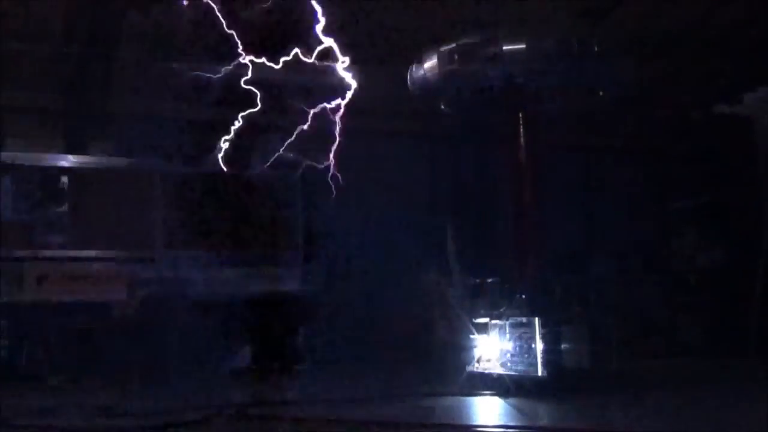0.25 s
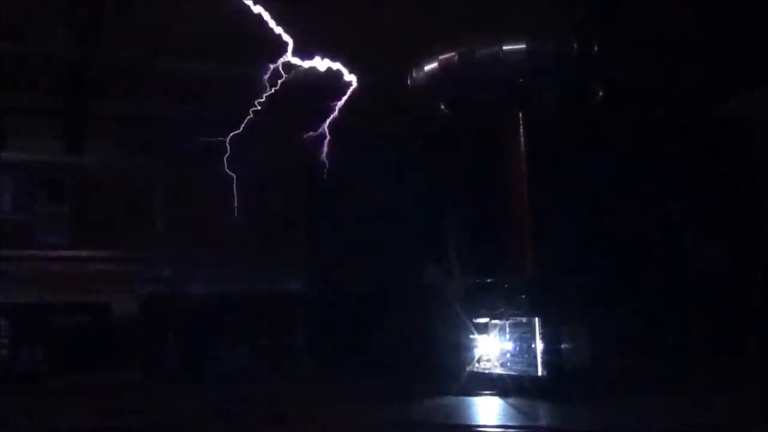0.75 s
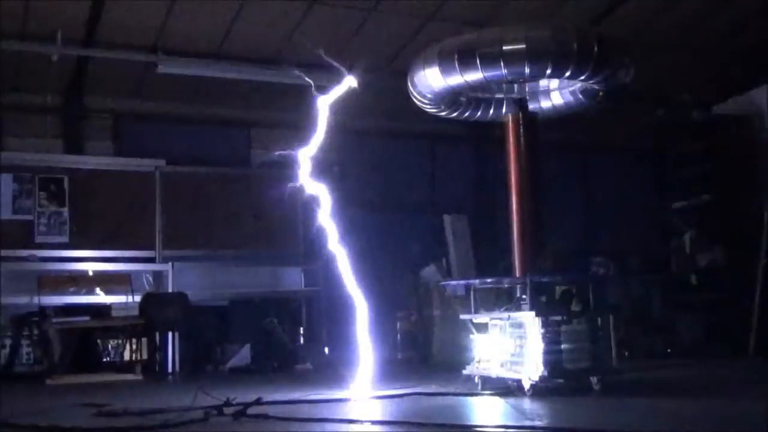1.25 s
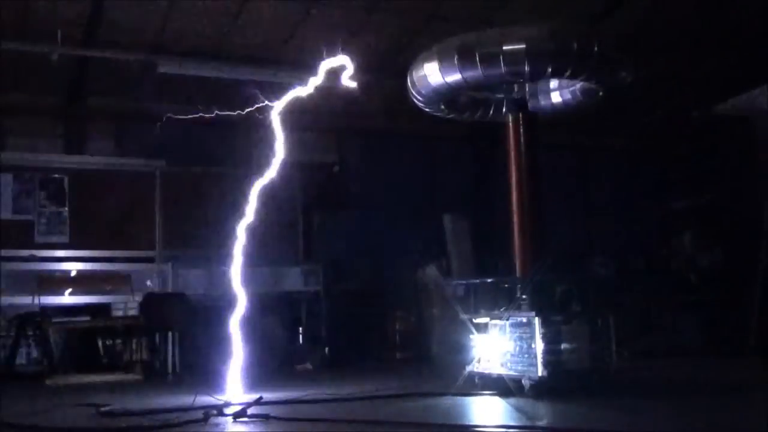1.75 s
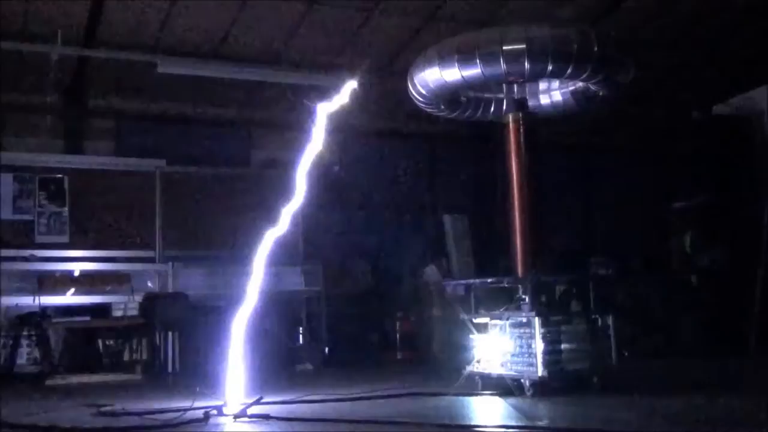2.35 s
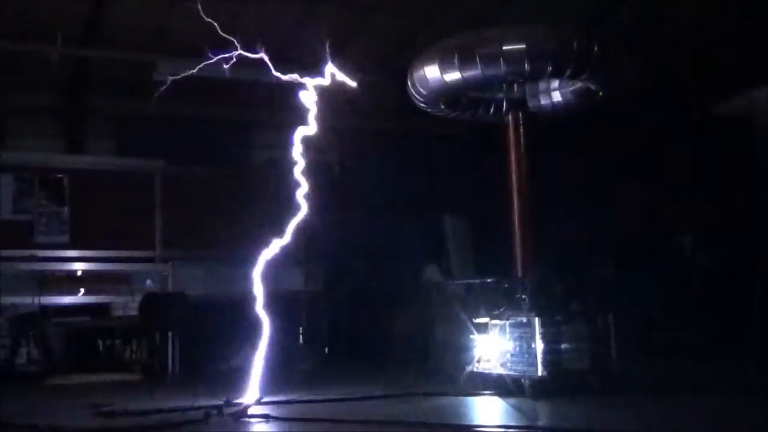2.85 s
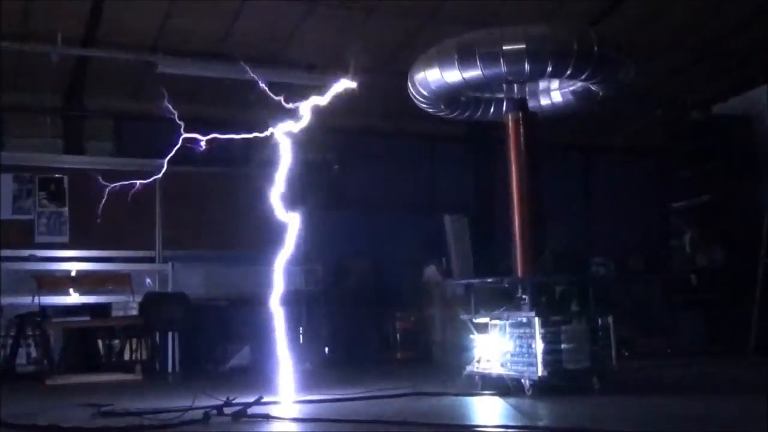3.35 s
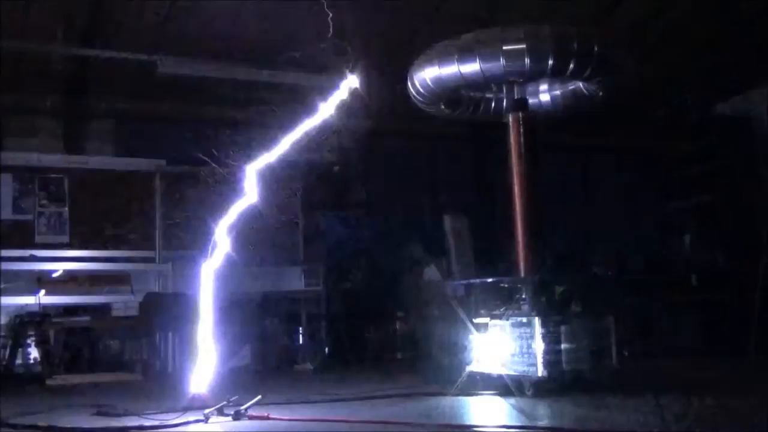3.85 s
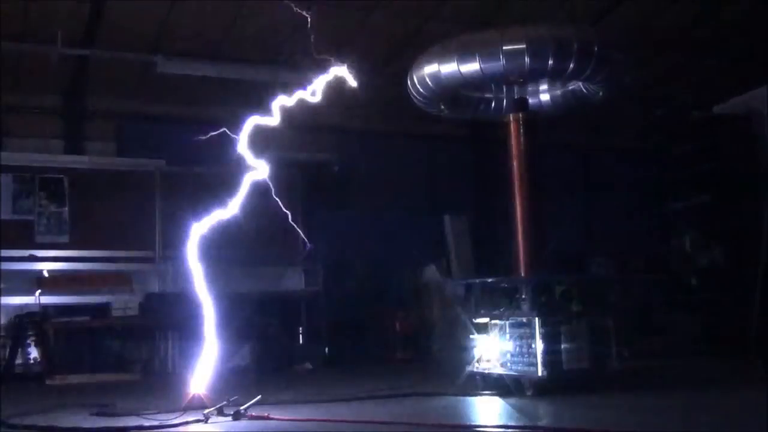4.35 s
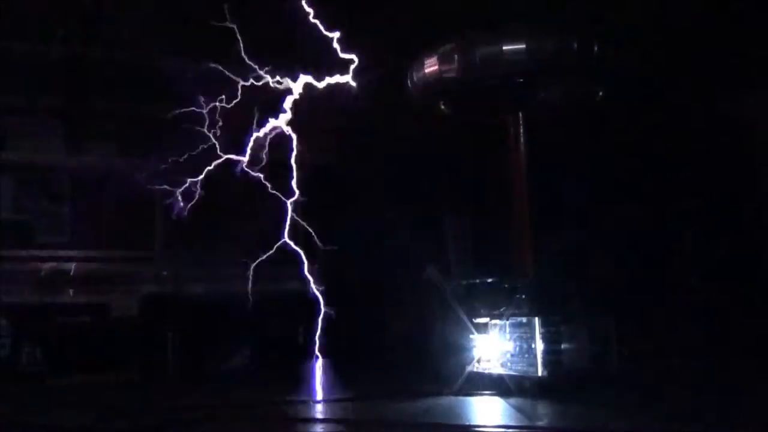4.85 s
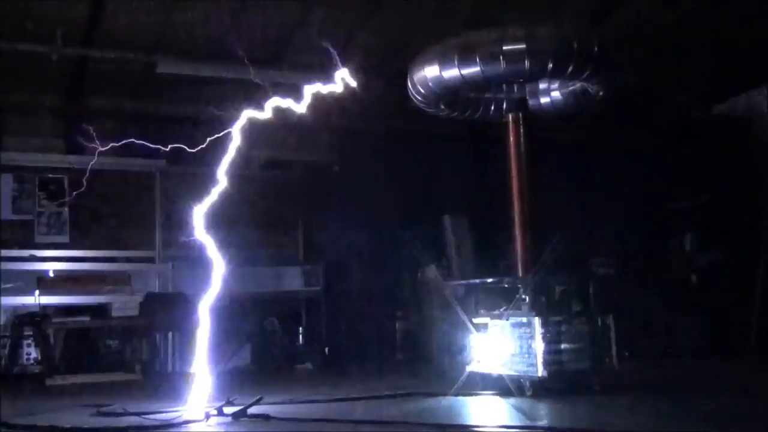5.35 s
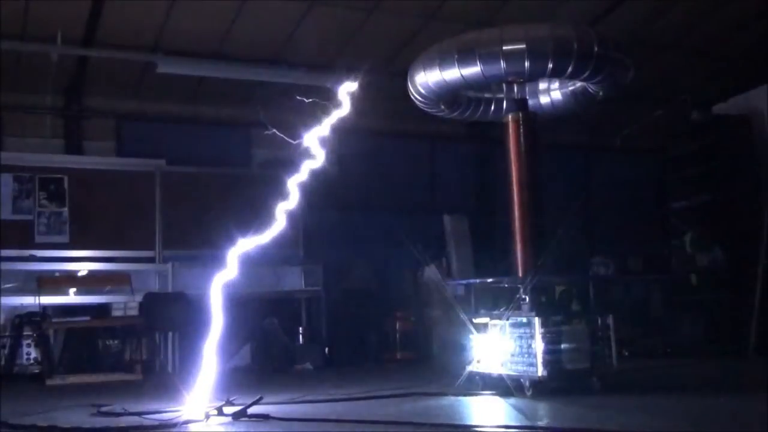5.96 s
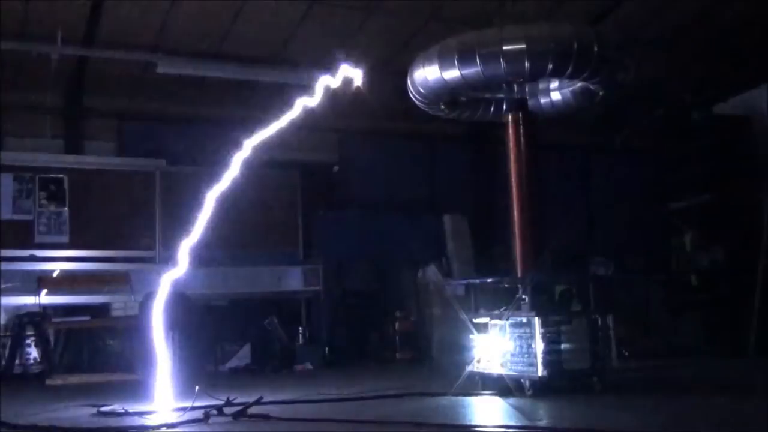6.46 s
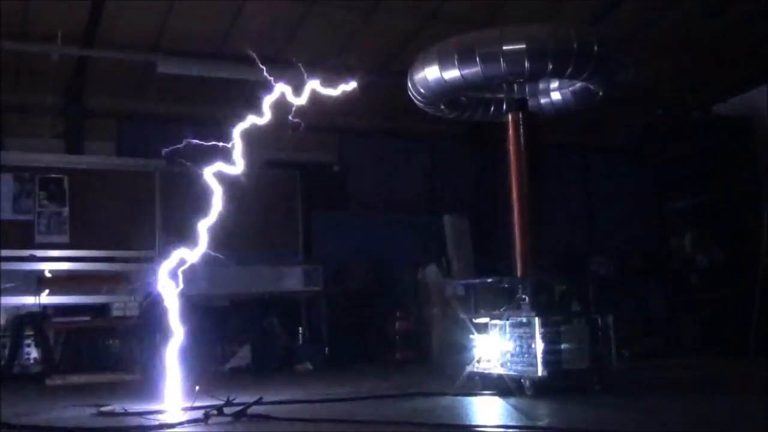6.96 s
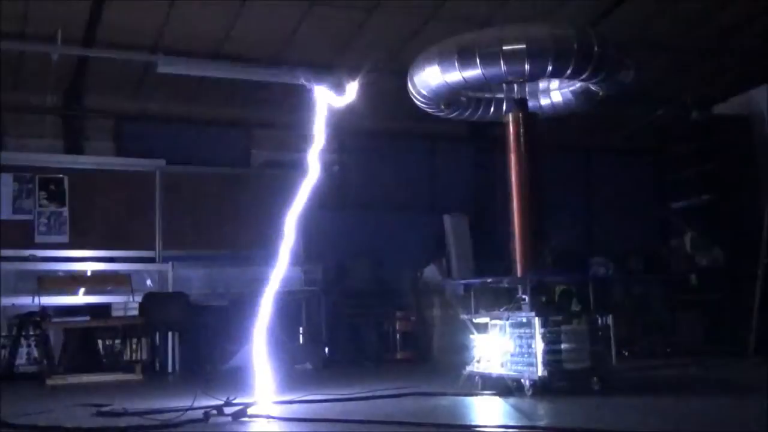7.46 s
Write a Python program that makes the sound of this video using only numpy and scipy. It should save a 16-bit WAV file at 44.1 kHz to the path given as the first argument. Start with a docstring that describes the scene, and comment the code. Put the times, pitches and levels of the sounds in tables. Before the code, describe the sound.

A big spark coil fires nonstop in a large hall: a loud, rough buzz at about two hundred bangs a second under bright, steady hiss. Whenever the arc stands on the floor, the buzz gains hard, sharp cracks, a nasal drone and faint thuds. Between strikes branching streamers flare and swell. Dull pops come irregularly, often clustered. Stereo pickup keeps the arc central, with diffuse reverberation around it.

```python
"""Repetitive spark discharge in a hall

A big spark-gap coil fires without pause, two hundred bangs a second; every bang hisses at the gap.
Each reheats a slowly writhing arc, so successive pressure waves are alike: branching streamers buzz.
While the arc stands on the floor, every bang is also a sharp crack, followed by a drone and uneven thuds.
Now and then a heavy discharge gives a dull pop; the hall answers, over a faint rumble.
Short bursts of low noise, opposite in left and right, start at the same times as the pops.
"""
import sys
import numpy as np
from scipy import signal
from scipy.fft import rfft, irfft, next_fast_len
from scipy.io import wavfile
from scipy.ndimage import uniform_filter1d, map_coordinates

SR = 44100
rng = np.random.default_rng(int(sys.argv[2]) if len(sys.argv) > 2 else 0)


def master(y):
    """Save y as 16-bit WAV."""
    cut = np.clip(np.atleast_2d(y).T, -1, 1)
    pcm = np.round(cut * 32767)  # scale
    wavfile.write(sys.argv[1], SR, pcm.astype(np.int16))


N = 340452

# Arc standing on the floor: start t/s, end t/s, delay of crack after bang t/s, relative crack level/dB,
# relative thud level/dB, trunk change/dB, main channel change/dB, greatest change soon after touchdown/dB
FLOOR_STRIKES = [(0.075, 0.296, 0.0017, -11, -40.5, -6.5, 1.5, -2.5),
                 (0.563, 0.719, 0.0007, -5.5, -70, 3, -0.5, 1),
                 (0.866, 1.082, 0.0006, -4.5, -66, 0.5, -1.5, -0.5),
                 (1.153, 1.481, 0.0053, -7.5, -54, 2, 3, -3),
                 (1.737, 2.003, 0.00062, -9, -45.5, -2, 4, -1.1),
                 (2.256, 2.342, 0.00081, -7, -64, -1, -3, 0.5),
                 (2.364, 2.668, 0.0042, -4.5, -55, -2, -3, 2), (2.786, 2.949, 0.005, -1, -57, -2.5, 2, 0),
                 (3.136, 3.441, 0.005, -1.5, -52, 0, 0.5, -3),
                 (3.891, 4.535, .002, -3.5, -44, -5, -1.5, -1.7),
                 (4.923, 5.09, 0.0042, -0.5, -49, 0.5, 1, -1), (5.121, 5.348, 0.0043, -1, -46, -2, 5, -1.6),
                 (5.371, 5.752, 0.0039, -1.5, -50, -1.5, -1.5, 1.4),
                 (5.758, 6.302, 0.0037, -0.5, -44.5, -5, 0.5, -1),
                 (6.37, 7.013, 0.0041, 0.5, -66, 1.5, -1, -1),
                 (7.38, 7.586, 0.0044, -1.5, -44, -5, -4, 2.1)]
# Heavy discharges to the floor: t/s, relative pop level/dB,
# relative level of the low antiphase noise that starts at the same time/dB
HEAVY_POPS = [(0.081, -16, -35), (0.108, -16, -44), (0.162, -25, -43), (0.177, -15, -27), (0.237, -23, -28),
              (0.279, -17, -46), (1.209, -16, -33), (1.271, -17, -37), (1.292, -21, -44), (1.316, -19, -48),
              (2.371, -11.5, -50), (2.476, -17, -33), (3.169, -18.5, -52), (3.379, -21, -31),
              (3.907, -18, -26), (3.951, -16, -35), (3.972, -18, -40), (4.007, -23, -50), (4.099, -23, -50),
              (4.123, -20, -31), (4.193, -28, -29), (4.232, -22, -28), (4.301, -23, -43), (4.337, -24, -28),
              (4.357, -17, -39), (4.382, -19, -41), (4.423, -25, -32), (4.443, -22, -38),
              (4.957, -18.5, -59), (5.077, -21, -59), (5.781, -16, -29), (5.838, -24, -37),
              (5.884, -21, -35), (5.975, -21, -31), (5.986, -17, -30), (6.133, -22, -39), (6.252, -22, -59),
              (7.003, -17, -52), (7.477, -15, -52)]
# The streamers flare into a wide tree: start t/s, end t/s, swell of the buzz/dB, swell of trunk and hum/dB
# (each part of the arc follows its swell by its own factor)
TREE_FLARES = [(0.0, 0.094, 1, 5), (0.316, 0.354, 4, 9), (0.446, 0.542, 2.5, -1), (0.725, 0.856, 3.5, 3),
               (1.08, 1.166, 2, 5), (1.465, 1.54, 1.5, 2.5), (1.725, 1.765, 3.5, 6),
               (1.992, 2.07, 1.5, 4.5), (2.095, 2.266, 2, 6.5), (2.334, 2.36, 5.5, 7),
               (2.55, 2.596, 2.5, 0), (2.74, 2.798, 2, 5), (2.937, 3.067, 3.5, 6), (3.458, 3.623, 0, 2.5),
               (3.84, 3.89, 1, -1), (4.027, 4.07, 2.5, 5), (4.538, 4.592, 0, 4.5), (4.778, 4.916, 4, 4),
               (5.17, 5.21, 2.5, -4), (5.67, 5.687, 10.5, 4), (6.303, 6.366, 3.5, 5),
               (6.787, 6.845, 3, 0.5), (7.025, 7.2, 4, -1), (7.21, 7.292, 6, 5), (7.574, 7.727, 4.5, 6.5)]
# Brief changes of the buzz, mostly dips: t/s, change of the main channel level/dB
BUZZ_DIPS = [(1.55, -7), (1.715, -4), (2.43, -5), (2.645, 0), (3.1, -3), (3.175, -7), (4.69, -8), (5.63, 1),
             (6.77, -3)]
# Base level of the hiss: t/s, level/dB
HISS_LEVEL = [(0.0, -14.5), (0.13, -17), (0.47, -15), (0.86, -16.5), (1.72, -15.5), (1.78, -18.5),
              (2.04, -16.5), (3.6, -15.5), (3.71, -14), (3.92, -16.5), (4.72, -15), (5.13, -17),
              (5.77, -14.5), (5.9, -16.5), (7.23, -15.5), (7.31, -16.5), (7.57, -15.5), (7.7, -17)]

# Spectral shapes of the sources: f/Hz, relative level/dB
BUZZ_SPECTRUM = [(100, -32), (200, -18), (400, -6.5), (600, -7.5), (800, -5.5), (1000, -2.5), (1500, 0),
                 (2000, -1), (3000, -5), (3700, -4), (5400, -3.5), (6300, -16), (8000, -8), (12000, -26)]
HISS_SPECTRUM = [(3530, -32), (6000, -10), (6480, -16.5), (6940, -9.5), (8300, -6), (9000, -4), (10600, 1),
                 (11600, 0.5), (14500, -6), (15800, -17)]
CRACK_SPECTRUM = [(150, -34), (400, -7.5), (1500, -1.5), (4800, -11), (6400, -26.5), (8500, -3), (11000, 3),
                  (13000, 0), (16000, -11.5)]
DRONE_SPECTRUM = [(100, -51), (200, -15.5), (400, -6.5), (800, -18), (1150, -16.5), (1400, -2.5),
                  (1700, -14), (2050, -6.5), (2800, -9), (5200, -8), (6400, -18.5), (10000, -27)]
THUD_SPECTRUM = [(20, -40), (60, -18), (150, -1), (350, 2.5), (700, 7.5), (1500, -0.5), (4000, -58)]
ANTIPHASE_SPECTRUM = [(40, -40), (120, -38), (220, -6), (350, -2), (600, 2), (1000, 0), (2000, -9),
                      (5000, -60)]  # low noise of opposite sign in left and right
RUMBLE_SPECTRUM = [(20, -24), (50, -39), (120, -5), (300, 2), (1000, 7), (8000, -40)]

# Relative time for which the channel keeps its shape, at the scale radiating each pitch: f/Hz, t/s
# (each source multiplies it by its own factor)
SHAPE_MEMORY = [(200, 0.35), (1200, 0.097), (4000, 0.035), (11000, 0.035)]
# Power share of each bang that is new: f/Hz, share/(0 to 1)
FRESH_SHARE = [(200, 0.07), (1200, 0.02), (4000, 0.12), (7000, 0.27), (11000, 0.08)]
# Reverberation time, for a decay of 60 dB: f/Hz, t/s
HALL_T60 = [(150, 0.18), (1500, 1.0), (5000, 0.16), (12000, 0.31)]
# The hall's answer between the two microphones: f/Hz, relative side level/dB
HALL_WIDTH = [(60, -45), (200, -61), (400, -26), (700, -10), (2000, -9.5), (5000, -10), (8000, -10),
              (10000, -21.5), (12000, -16.5), (15000, -106)]

# Parts of the arc, low to high: level in free air/dB, dB per dB of flare, scale of random writhing/dB
HUM_PART = (-43, 1, 1.17)
TRUNK_PART = (-35, 1.0, 0.98)
CHANNEL_PART = (-29.5, 1.2, 0.86)
BRANCH_PART = (-23, 0.81, 0.7)

BANG_HZ = 199.77
PART_EDGES_HZ = (110, 500, 1100, 2500, 6500)  # hum, trunk, channel and branches lie between; hiss above
WRITHE_PER_S = 14  # knots of the random level curves
FLARE_RISE_S, FLARE_FALL_S = 0.021, 0.015
STARVE_S, REGROW_S = 0.017, 0.033  # time constants of a strike's level changes, on and off
STARVED_DB = -2.0  # thin branches while the arc stands on the floor
SAG_S = 0.072  # from touchdown to the greatest sag
HISS_OFFSET_DB, HISS_FLUTTER_DB = -0.17, 0.66
DIP_S, DIP_SHARE = 0.017, 0.4  # half-width of a dip to 1/e; share joined by trunk and branches
ANTIPHASE_S = 0.026  # decay time constant of the antiphase noise, from each listed time on
LOW_CUT_HZ, TOP_HZ = 48, 16000  # the microphone's bass roll-off; the band limit


def amp(db):
    """Level definition: decibels to an amplitude ratio."""
    return 10 ** (np.asarray(db) / 20)


def unit(x):
    """Normalization to unit rms."""
    return x / np.sqrt(np.mean(x ** 2) + 1e-20)


def steady(x, size=3087):
    """Automatic level control: divide by the moving rms over size samples."""
    return x / np.sqrt(np.abs(uniform_filter1d(x ** 2, size)) + 1e-12)


def along(points, hz):
    """Linear interpolation of (f/Hz, value) points on a logarithmic frequency axis."""
    f, v = np.transpose(points)
    return np.interp(np.log(hz + 1), np.log(f + 1), v)


def filtered(x, response):
    """Linear filtering: the spectrum of x multiplied by a response of frequency."""
    size = next_fast_len(N + SR // 2)
    hz = np.fft.rfftfreq(size, 1 / SR)
    return irfft(rfft(x, size) * response(hz), size)[..., :N]


def coloured(x, spectrum):
    """Spectral shaping of x by (f/Hz, level/dB) points."""
    return filtered(x, lambda hz: amp(along(spectrum, hz)))


def wobble(rate):
    """Band-limited fluctuation: a smooth curve through random knots, rate of them a second."""
    knots = rng.standard_normal(int(N * rate / SR) + 4)
    return map_coordinates(knots, [np.arange(N) * rate / SR])


def swell(start, end, rise, fall):
    """Exponential relaxation: approaches 1 from start on, and dies away after end."""
    t = np.arange(N) / SR
    growth = 1 - np.exp(-np.maximum(t - start, 0) / rise)
    return growth * np.exp(-np.maximum(t - end, 0) / fall)


def bang_times():
    """Periodic excitation: the gap fires evenly, in step with the mains."""
    return np.arange(int(N / SR * BANG_HZ) + 1) / BANG_HZ


def scatter(spread_db):
    """Log-normal scatter: a random size for each bang."""
    return amp(spread_db * rng.standard_normal(len(bang_times())))


def channel_waves(lasting, size=512):
    """Correlated radiation: the channel's kinks drift slowly from bang to bang, and a share is new each time."""
    hz = np.fft.rfftfreq(size, 1 / SR)
    shape, new = rfft(rng.standard_normal((2, len(bang_times()), size)))
    keep = np.exp(-1 / (BANG_HZ * lasting * along(SHAPE_MEMORY, hz)))
    for i in range(1, len(shape)):
        shape[i] = keep * shape[i - 1] + np.sqrt(1 - keep ** 2) * shape[i]
    share = np.clip(along(FRESH_SHARE, hz), 0, 1)
    waves = irfft(np.sqrt(1 - share) * shape + np.sqrt(share) * new)
    return waves, np.arange(size) / SR


def train(waves, times, sizes, jitter, margin=16):
    """Superposition of one wave at each time, with random timing scatter of jitter seconds."""
    at = np.maximum(times + jitter * rng.standard_normal(len(times)), 0) * SR
    waves = np.pad(waves, ((0, 0), (margin, margin)))
    size = waves.shape[1]
    # a phase slope delays each wave by a fraction of a sample
    late = np.exp(-2j * np.pi * np.fft.rfftfreq(size) * (at % 1)[:, None])
    waves = irfft(rfft(waves) * late, size) * sizes[:, None]
    places = at.astype(int)[:, None] + np.arange(size)
    return np.bincount(places.ravel(), waves.ravel(), N + margin)[margin:N + margin]


def streamers(grounded):
    """Extended source: metres of branches sound at once, so each bang is smeared; a strike starves them."""
    waves, t = channel_waves(lasting=1.19)
    smear = t * np.exp(-t / 0.0027) * (1 - t / t[-1])
    uneven = 1 + 0.011 * (-1) ** np.arange(len(waves))  # every other bang finds more charge
    sizes = uneven * scatter(0.68) * amp(-6 * grounded)
    return unit(coloured(train(waves * smear, bang_times(), sizes, jitter=6e-6), BUZZ_SPECTRUM))


def sizzle(grounded):
    """Impulsive and sustained noise: the gap spits at each bang, the streamer tips hiss all through the cycle."""
    waves, t = channel_waves(lasting=2.2)
    burst = t * np.exp(-t / 0.00029)
    spit = train(waves * burst, bang_times() + 0.000184, scatter(0.75), jitter=1.2e-5)
    waves, t = channel_waves(lasting=0.86)
    sparks = np.sin(np.pi * t / t[-1]) ** 2 * amp(1.9 * rng.standard_normal(waves.shape))
    tips = train(waves * sparks, bang_times(), scatter(1.0) * amp(-2.5 * grounded), jitter=1e-5)
    return unit(coloured(unit(tips) + amp(-1.5) * unit(spit), HISS_SPECTRUM))


def arc_levels():
    """Level modulation of hum, trunk, channel, branches: flares swell all; strikes and dips shift the last three."""
    t = np.arange(N) / SR
    swells = np.array([swell(start, end, FLARE_RISE_S, FLARE_FALL_S) for start, end, *_ in TREE_FLARES])
    high, low = np.array(TREE_FLARES)[:, 2:].T @ swells
    parts = [(HUM_PART, low), (TRUNK_PART, low), (CHANNEL_PART, high), (BRANCH_PART, high)]
    levels = np.array([db + follows * flare + writhe_db * wobble(WRITHE_PER_S)
                       for (db, follows, writhe_db), flare in parts])
    for start, end, *_, trunk_db, channel_db, sag_db in FLOOR_STRIKES:
        age = np.maximum(t - start, 0) / SAG_S
        sag = sag_db * age * np.exp(1 - age)
        change = np.array([[trunk_db], [channel_db], [STARVED_DB]]) + sag
        levels[1:] += swell(start, end, STARVE_S, REGROW_S) * change
    dips = sum(db * np.exp(-np.minimum(np.abs(t - s) / DIP_S, 10) ** 2) for s, db in BUZZ_DIPS)
    return levels + np.outer([0, DIP_SHARE, 1, DIP_SHARE], dips)


def hall(x, size=16384):
    """Diffuse reverberation as (mid, side): the arc keeps moving, so each stretch meets new reflections."""
    lead = np.concatenate([x[:size], x, np.zeros(2 * size)])  # the coil is already running
    wet = np.zeros((2, len(lead) + 4 * size))
    for start in range(0, N + size, size):
        hz, t, z = signal.stft(rng.standard_normal((2, 2 * size)), SR, nperseg=256)
        t60 = along(HALL_T60, hz)[:, None]
        tail = signal.istft(z * amp(-60 * t / t60) / np.sqrt(t60), SR, nperseg=256)[1]
        stretch = lead[start:start + 2 * size] * signal.windows.cosine(2 * size)
        answer = signal.fftconvolve(stretch[None], tail / np.linalg.norm(tail[0]), axes=1)
        wet[:, start:start + answer.shape[1]] += answer
    mid, side = wet[:, size:size + N]
    return mid, coloured(side, HALL_WIDTH)


def rumble():
    """Stationary random noise: a faint background shaped by its spectrum."""
    return amp(-60) * unit(coloured(rng.standard_normal(N), RUMBLE_SPECTRUM))


def strikes():
    """Propagation delay: each bang's crack arrival, with crack and thud sizes (zero with the arc in the air)."""
    times = bang_times()
    delay, crack, thud = np.zeros((3, len(times)))
    for start, end, lag, crack_db, thud_db, *_ in FLOOR_STRIKES:
        on = (times >= start) & (times < end)
        delay[on], crack[on], thud[on] = lag, amp(crack_db), amp(thud_db)
    return times + delay, crack, thud


def floor_arc(arrive, crack, thud):
    """Line source: the nearest part of a straight hot channel cracks, the rest drones after it, with thuds."""
    waves, t = channel_waves(lasting=0.87)
    snaps = waves * (np.exp(-t / .0001) + 0.39 * np.exp(-t / 0.00016))
    snaps[:, 0] += 1.5  # the shock front is always a push
    snaps /= np.linalg.norm(snaps, axis=1, keepdims=True)
    cracks = coloured(train(snaps, arrive, crack * scatter(0.31), jitter=1.2e-5), CRACK_SPECTRUM)
    waves, t = channel_waves(lasting=3.1)
    rest = waves * t * np.exp(-t / 0.00096)
    drone = coloured(train(rest, arrive, crack * scatter(2.1), jitter=1.2e-5), DRONE_SPECTRUM)
    puffs = rng.standard_normal(waves.shape) * np.exp(-t / 0.00099)
    thuds = coloured(train(puffs, arrive, thud * scatter(3.3), jitter=1e-5), THUD_SPECTRUM)
    return unit(cracks), unit(drone), unit(thuds) * np.sqrt(np.mean(thud ** 2))


def pops():
    """Blast wave: a heavy discharge pushes the air out once, and a longer suction follows."""
    out, t = np.zeros(N + SR), np.arange(SR // 50) / SR
    for (s, db, _), chance in zip(HEAVY_POPS, rng.standard_normal(len(HEAVY_POPS))):
        u = t / (0.0005 * np.exp(0.12 * chance))  # time over the length of the push
        out[round(s * SR):][:len(t)] += amp(db + 8.0) * (1 - u) * np.exp(-u)

    def dull(hz):
        low_pass = 1 / (1 + 1j * hz / 1600) ** 2
        high_pass = (1j * hz / (40 + 1j * hz)) ** 2
        return low_pass * high_pass

    return filtered(out[:N], dull)


def antiphase_noise():
    """Decaying low noise, heard with opposite sign in left and right, started at the listed times."""
    times = bang_times()
    sizes = sum(amp(db) * (times >= s) * np.exp(-np.abs(times - s) / ANTIPHASE_S) for s, _, db in HEAVY_POPS)
    t = np.arange(SR // 90) / SR
    puffs = rng.standard_normal((len(times), len(t))) * np.exp(-t / 0.0034)
    noise = coloured(train(puffs, times, sizes * scatter(3.7), jitter=1e-5), ANTIPHASE_SPECTRUM)
    return unit(noise) * np.sqrt(np.mean(sizes ** 2))


def discharge():
    """Scaling of radiated pitch: thick parts sound low, thin ones high, each swelling as the arc writhes."""
    arrive, crack, thud = strikes()
    grounded = crack > 0
    cracks, drone, thuds = floor_arc(arrive, crack, thud)
    sound = amp(-5.5) * streamers(grounded) + amp(-11.5) * drone + sizzle(grounded) + amp(-6) * cracks
    below = [filtered(sound, lambda hz: 1 / (1 + (hz / edge) ** 16)) for edge in PART_EDGES_HZ]
    *parts, tips = np.diff([*below, sound], axis=0)  # differences of low-passes are bands
    buzz = sum(amp(db) * steady(part) for db, part in zip(arc_levels(), parts))
    hiss_db = np.interp(np.arange(N) / SR, *np.transpose(HISS_LEVEL))
    tips_db = hiss_db + HISS_OFFSET_DB + HISS_FLUTTER_DB * wobble(WRITHE_PER_S)
    return buzz + amp(tips_db) * steady(tips) + amp(3) * thuds


def scene():
    """Mid-side superposition: arc, pops, rumble and hall in the middle; hall and antiphase noise at the sides."""
    arc = discharge() + pops()
    wet, side = hall(arc)
    mid = arc + amp(-9.5) * wet + rumble()
    side = amp(-1.05) * side + antiphase_noise()
    return np.array([mid + side, mid - side])


def record(dry):
    """Saturation and band limiting: the tallest peaks are rounded off, deep bass and extreme treble cut."""
    rounded = dry / (1 + np.abs(dry / .88) ** 8) ** (1 / 8)

    def band(hz):
        low_cut = -hz ** 2 / (LOW_CUT_HZ ** 2 - hz ** 2 + np.sqrt(2) * 1j * hz * LOW_CUT_HZ)
        return low_cut * (hz < TOP_HZ)

    return filtered(rounded, band)


dry = scene()
out = record(dry)
master(out)
```